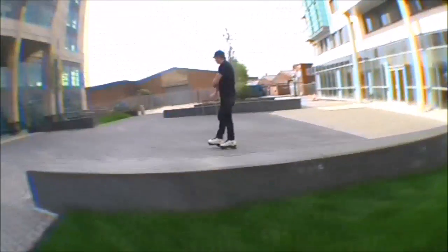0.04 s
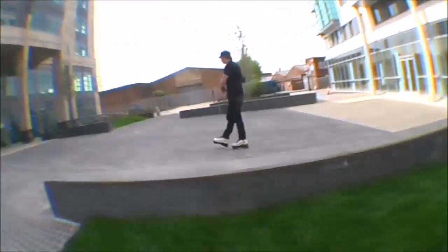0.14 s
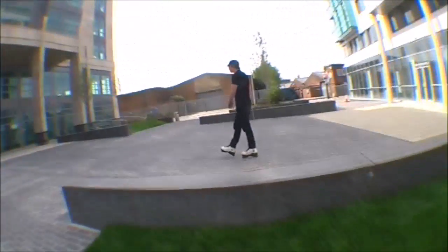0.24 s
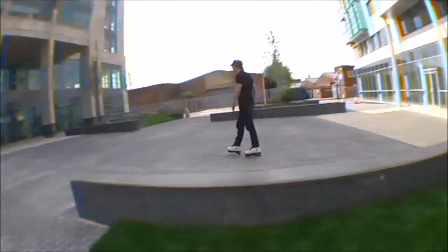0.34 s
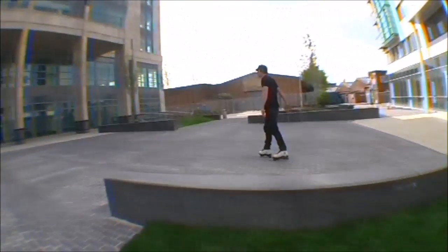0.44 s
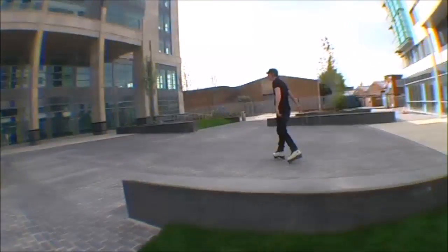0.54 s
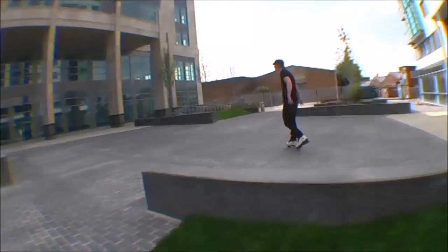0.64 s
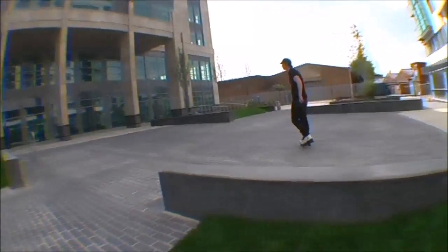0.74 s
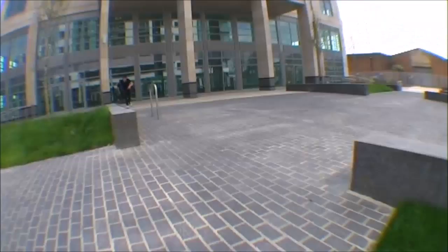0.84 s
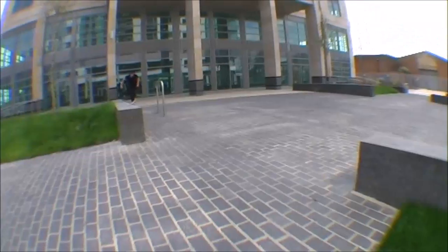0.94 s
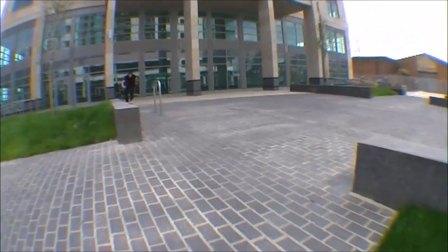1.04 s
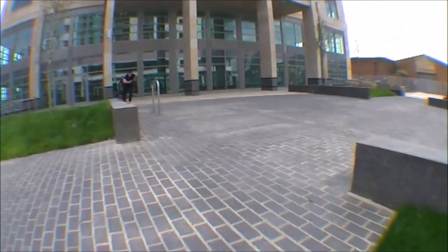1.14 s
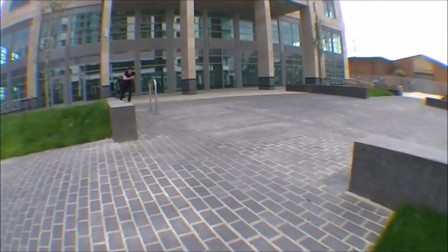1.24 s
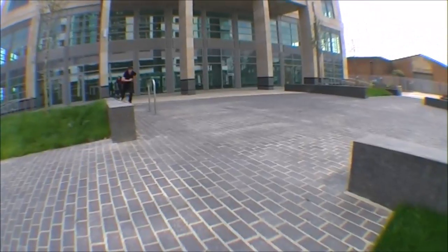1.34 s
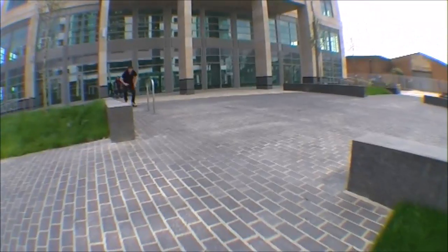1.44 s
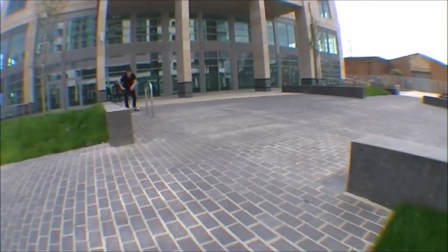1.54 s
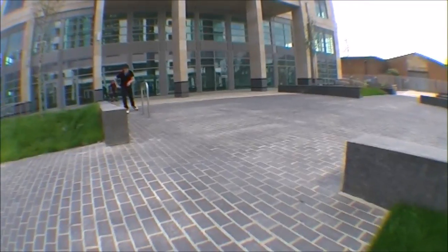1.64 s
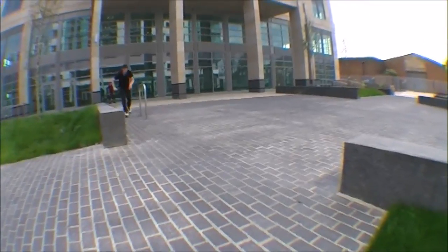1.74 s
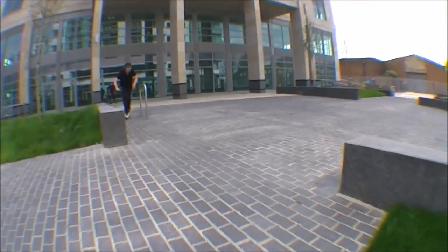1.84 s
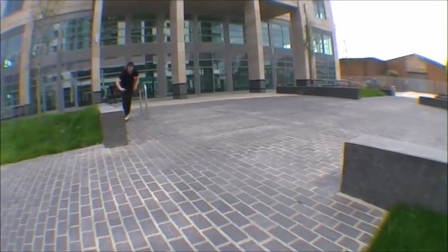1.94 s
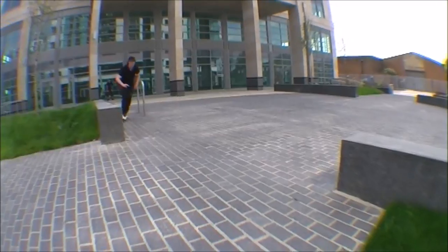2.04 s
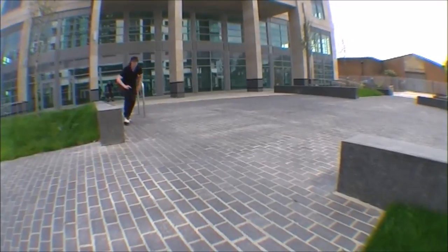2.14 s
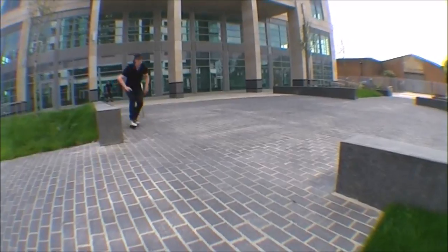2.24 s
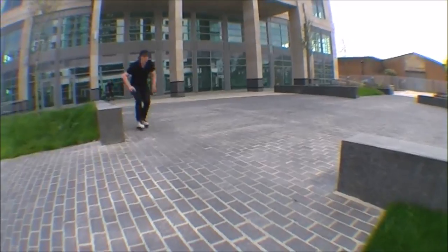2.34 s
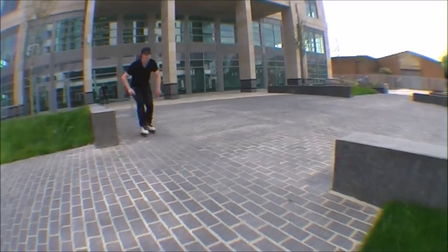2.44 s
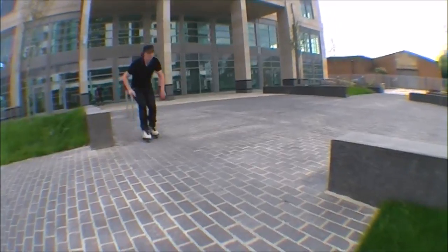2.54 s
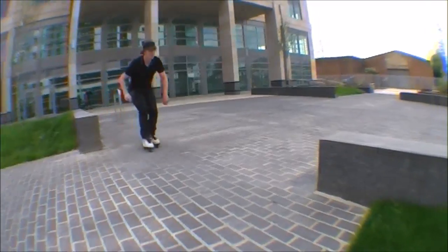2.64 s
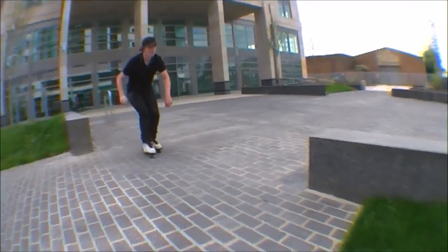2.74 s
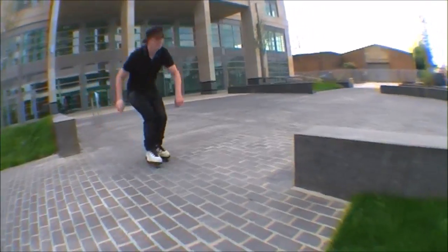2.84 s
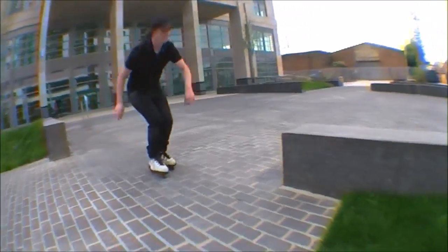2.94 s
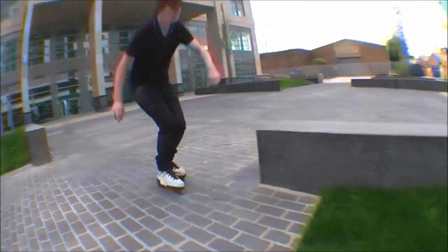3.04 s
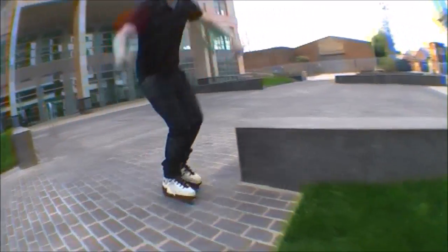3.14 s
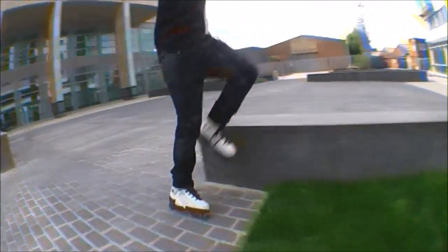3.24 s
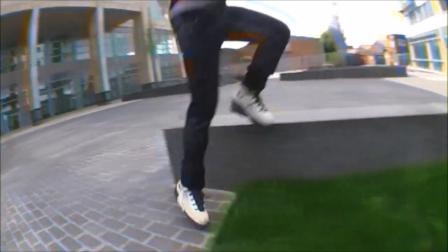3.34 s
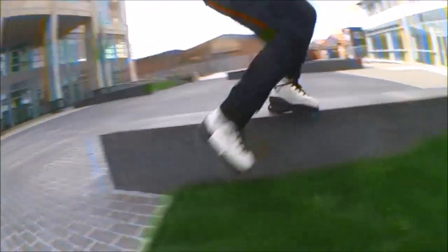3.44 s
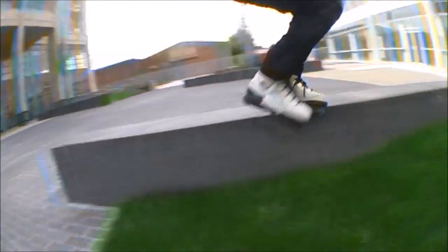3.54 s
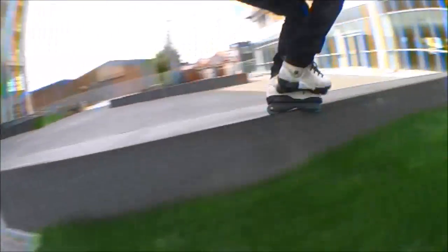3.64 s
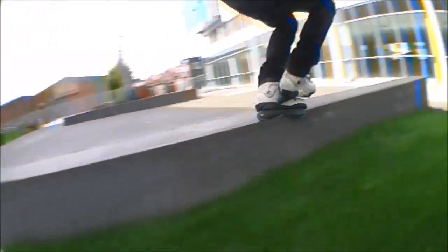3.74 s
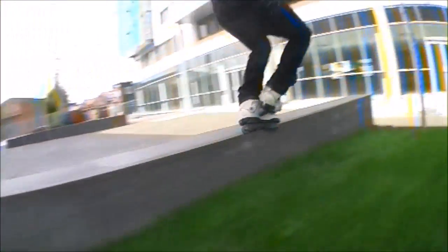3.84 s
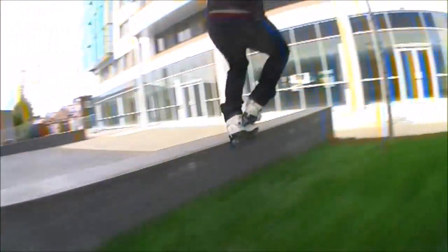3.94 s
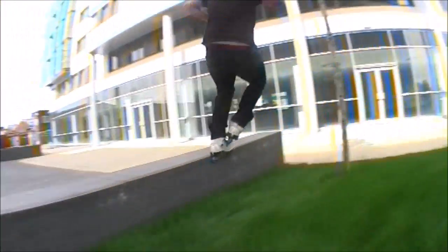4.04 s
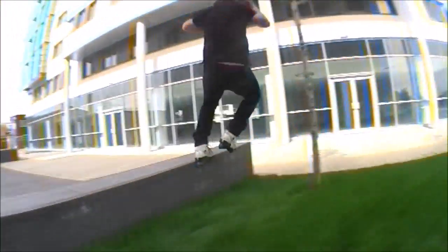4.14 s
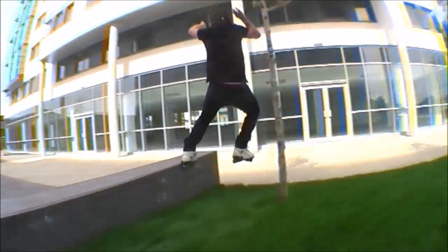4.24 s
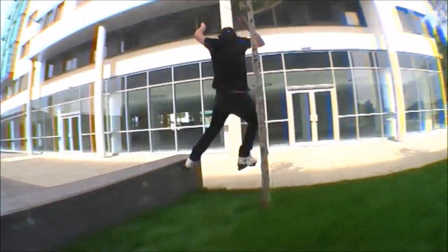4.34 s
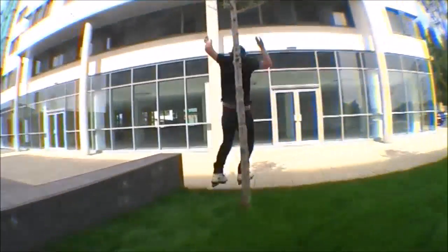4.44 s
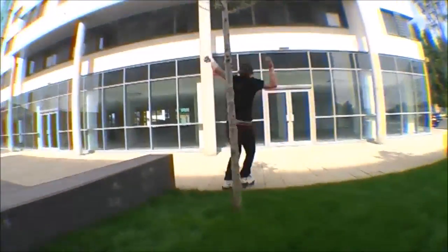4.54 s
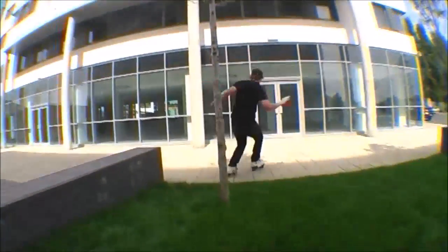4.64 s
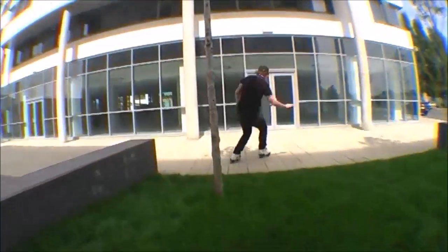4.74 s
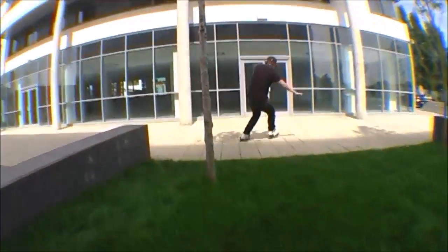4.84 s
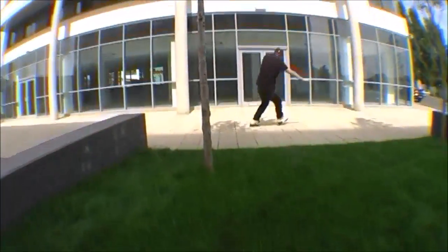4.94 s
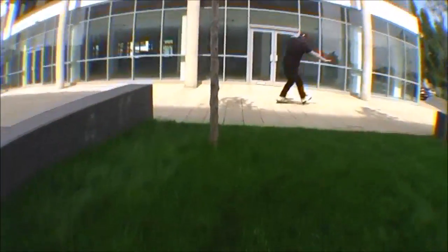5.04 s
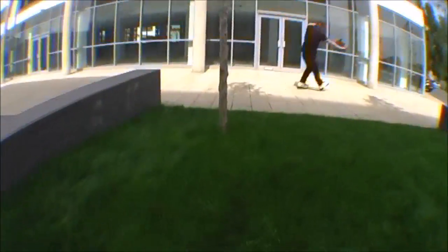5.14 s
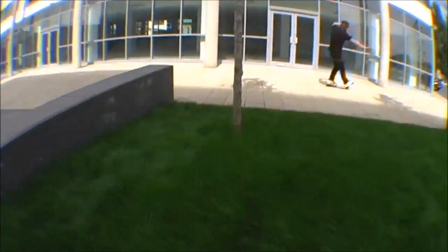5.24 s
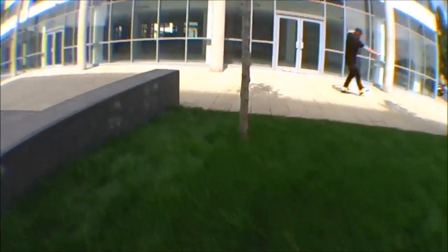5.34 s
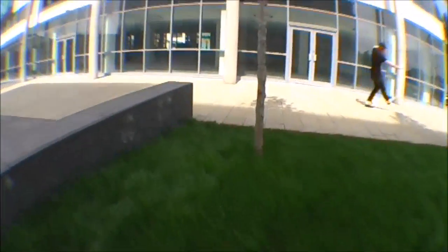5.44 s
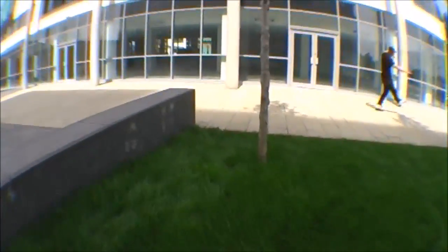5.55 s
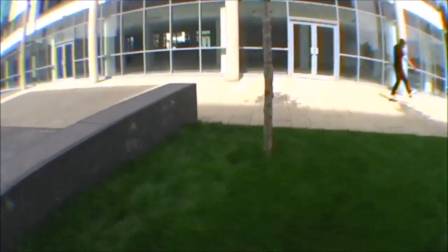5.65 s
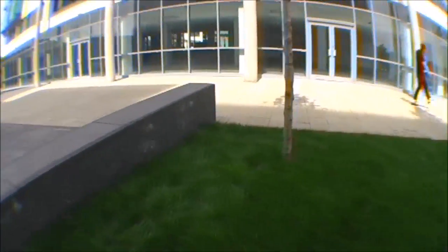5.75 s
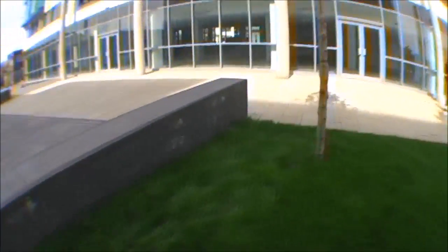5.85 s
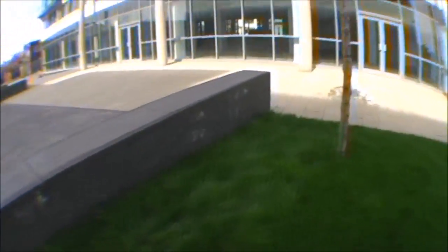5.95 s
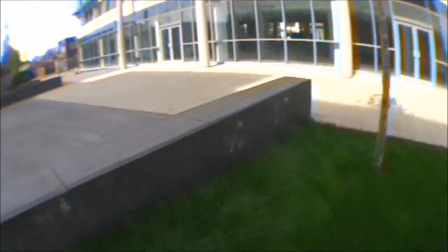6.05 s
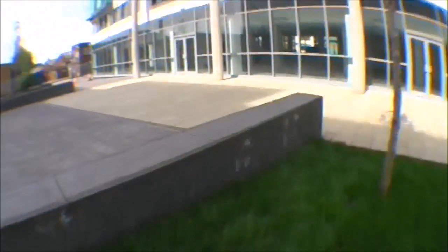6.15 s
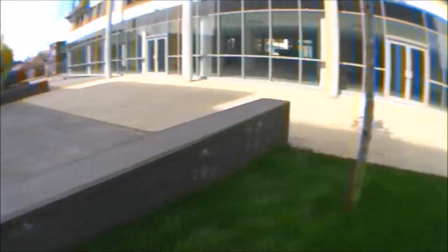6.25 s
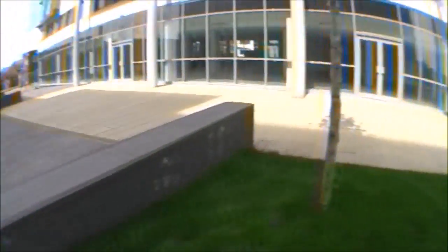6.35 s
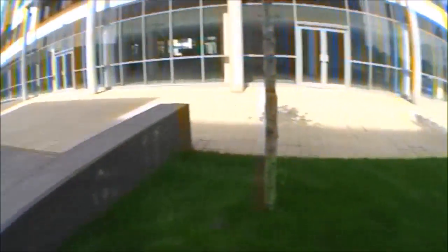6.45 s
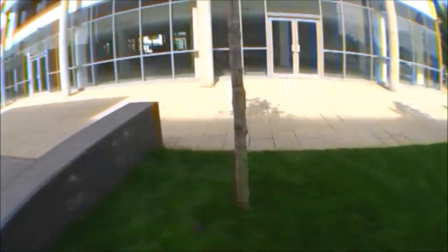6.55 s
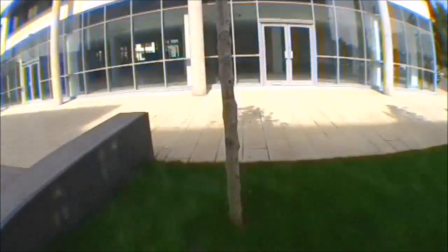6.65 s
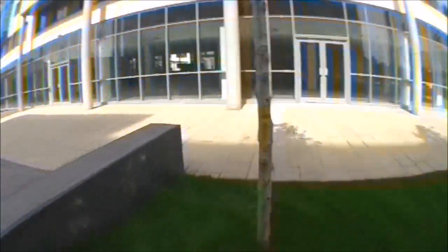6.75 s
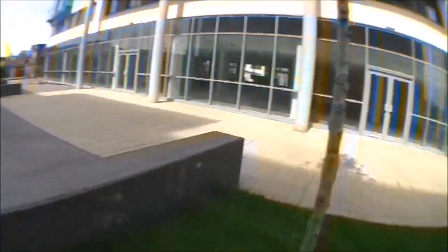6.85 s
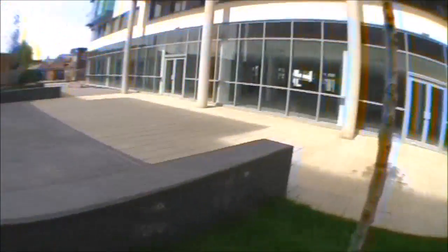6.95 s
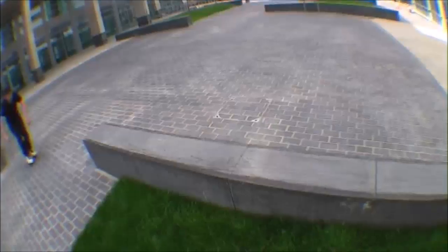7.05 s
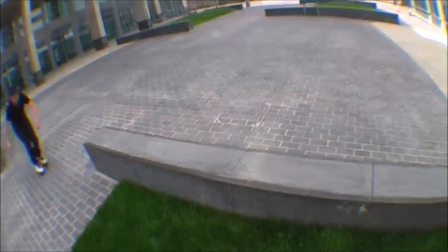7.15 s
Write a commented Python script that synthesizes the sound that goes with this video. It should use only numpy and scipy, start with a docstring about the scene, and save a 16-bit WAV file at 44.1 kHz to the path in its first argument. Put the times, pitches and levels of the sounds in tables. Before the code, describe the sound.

A thin, bass-light close outdoor microphone hears dull, faint wheel rolling and small dry ticks at first. From about 0.9 s wind rumbles and flutters strongly, gusting until past 3 s; a sharp tick comes at 1.0 s and raspy push-off scuffs at 1.15 and 1.6 s. From 1.9 s hard wheels approach, clicking over paving joints, with a knock at 2.8 s and hiss swelling to 3.25 s. At 3.39 s a huge plastic clack overloads slightly, followed by rapid knocks, a short squeal near 3.57 s and a rough, uneven grind, strongest at 3.7-3.9 s, rattling on until 4.3 s with a thin echo. Rolling drops away briefly, then a tight cluster of thuddy clacks lands at 4.52-4.58 s. Gritty bright rolling continues, fading after 5.2 s with a small clack at 5.16 s. Duller distant rolling swells around 6 s, and light wind gusts persist, rising at the end near 7.2 s.

```python
"""Inline skater grinding a ledge in wind

An inline skater rolls in over paving, hops on a concrete ledge, grinds along it, drops off and rolls away.
Wheels are rough-ground noise exciting the modes of the frame; knocks, joints and ticks are decaying bursts.
The grind is irregular slipping heard through moving resonances, with a short squeal.
Gusts are shaped noise buffeting a microphone close by, which overloads on the hardest clacks.
Duller, more distant rolling lies beneath, and a thin echo follows the skate's knocks, grind and scuffs."""
import sys
import numpy as np
from scipy import signal
from scipy.fft import rfft, irfft, next_fast_len
from scipy.io import wavfile
from scipy.ndimage import uniform_filter1d

SR = 44100
rng = np.random.default_rng(int(sys.argv[2]) if len(sys.argv) > 2 else 0)


def wav_record(signal):
    """Record a signal, one row per channel, as 16-bit PCM in the file named by sys.argv[1]."""
    frames = np.transpose(np.atleast_2d(signal))
    bounded = np.clip(frames, -1, 1)
    # unit amplitude maps onto the largest positive 16-bit level
    quanta = np.round(bounded * 32767).astype(np.int16)
    wavfile.write(sys.argv[1], SR, quanta)


N = 317740
T = np.arange(N) / SR


def amp(db):
    """Decibel law: the amplitude ratio of a level."""
    return 10 ** (np.asarray(db) / 20)


def evened(x):
    """Normalization by energy: scales x to rms 1."""
    return x / np.sqrt(np.mean(x ** 2) + 1e-20)


def peaked(x):
    """Normalization by peak: scales x to a largest excursion of 1."""
    return x / abs(x).max()


def columns(rows):
    """Linear interpolation: each column after the time becomes a curve over all samples."""
    s, *values = np.transpose(rows)
    return [np.interp(T, s, v) for v in values]


def colour(x, points):
    """Spectral shaping: weights x in frequency and sets its rms to 1."""
    f, db = np.transpose(points)
    size = next_fast_len(len(x))
    hz = np.fft.rfftfreq(size, 1 / SR)
    gain = amp(np.interp(np.log(hz + 1), np.log(f), db))
    return evened(irfft(rfft(x, size) * gain, size)[:len(x)])


def band(x, lo_hz, hi_hz):
    """Band-pass filtering between two corner frequencies."""
    return signal.sosfilt(signal.butter(2, [lo_hz, hi_hz], "bandpass", fs=SR, output="sos"), x)


def resonate(x, hz, width):
    """Heterodyne resonance of gain 1: shifts the curve hz down to zero, smooths, and shifts back."""
    turn = np.exp(2j * np.pi * np.cumsum(hz * np.ones(len(x))) / SR)
    r = np.exp(-np.pi * width / SR)
    return 2 * (turn * signal.lfilter([1 - r], [1, -r], x / turn)).real


def lumps(hz):
    """Low-passed noise: a slow random curve of rms 1, changing up to about hz times a second."""
    return evened(signal.sosfilt(signal.butter(2, hz, fs=SR, output="sos"), rng.standard_normal(N)))


def swell(s, rise_s, fall_s):
    """Bell-shaped envelope: a rise to 1 at time s and a fall after it."""
    return np.exp(-((T - s) / np.where(T < s, rise_s, fall_s)) ** 2)


def drifting(x, depth_db):
    """Random spectral modulation in patches some 260 Hz wide and a tenth of a second long."""
    z = signal.stft(x, nperseg=512, noverlap=384)[2]
    patches = uniform_filter1d(rng.standard_normal(z.shape[::-1]), size=40, axis=0)  # along time
    patches = uniform_filter1d(patches, size=3, axis=1)  # along frequency
    return signal.istft(z * amp(depth_db * evened(patches).T), nperseg=512, noverlap=384)[1][:N]


# Strength of the gusts. Each row: time in seconds, rumble level in dB before its random lumps.
GUSTS = [(0.0, -28.5), (0.272, -37), (0.288, -41.5), (0.722, -40.5), (0.88, -32), (0.89, -24), (0.98, -15),
         (1.22, -15.5), (1.33, -25), (1.68, -11), (1.8, -17.5), (2.14, -14), (3.13, -17), (3.25, -22.5),
         (3.28, -16.5), (3.32, -39), (3.35, -19), (3.38, -29), (3.46, -36.5), (3.712, -35), (3.88, -20),
         (3.924, -30), (4.018, -40), (4.31, -39), (4.34, -41.5), (4.52, -47), (4.6, -31.5), (4.91, -28),
         (4.97, -31.5), (5.37, -30.5), (5.4, -34), (5.45, -26.5), (5.49, -36), (5.81, -30), (5.87, -39.5),
         (5.92, -27), (6.18, -38), (6.21, -28.5), (6.74, -24.5), (6.83, -43), (6.88, -33), (6.95, -35),
         (7.05, -36), (7.07, -23.5), (7.186, -17.5), (7.2, -18)]
# Slow change of the wind's colour. Each row: time in seconds, flutter above the rumble in dB, boom level in dB
# before its lumps.
WIND_COLOUR = [(0, -13, -25), (.5, -3, -49.5), (.95, -12.5, -26), (2.0, -9.5, -26), (2.7, -6.5, -30),
               (3.08, -1.5, -21), (3.4, -11.5, -48), (3.6, -12, -40), (3.75, -5, -31), (3.89, -11, -20),
               (3.97, -5, -31), (4.2, 2, -57), (4.9, -2.5, -53), (5.5, -9, -48), (5.8, -12.5, -35),
               (7.0, -9.5, -34), (7.2, -6, -31)]
# Spectra of the three wind bands. Each row: frequency in Hz, relative density in dB per Hz.
RUMBLE_SPECTRUM = [(30, -72), (60, -67), (90, 0), (110, -3.5), (145, -1), (195, 1), (244, -2), (300, -12),
                   (420, -46), (1500, -120)]
FLUTTER_SPECTRUM = [(100, -60), (280, 1), (360, 5.5), (500, 0), (600, -10), (1000, -11.5), (4000, -110)]
BOOM_SPECTRUM = [(15, -70), (35, -27), (60, -10.5), (85, -10), (110, -6), (400, -110)]
# How much the two ports differ as the microphone turns, against the sound they share; also used by rolling.
# Each row: time in seconds, wind difference in dB, treble difference in dB against the grit.
PORT_DIFFERENCE = [(0, -43, -35), (.85, -16, -10), (.92, -68, -70), (3.3, -68, -47), (3.85, -17, -41),
                   (4.5, -56, -24), (5.1, -64, -14), (5.6, -11.5, -3.5), (6.6, -7.5, 8.5), (6.75, -11, -9),
                   (7.05, -18, -2), (7.1, -6.5, 7)]


def wind():
    """Turbulence noise: eddies burst on the ports, part differing left to right. Returns mid and side."""
    rumble_db, = columns(GUSTS)
    flutter_db, boom_db = columns(WIND_COLOUR)
    difference_db, _ = columns(PORT_DIFFERENCE)
    lumpy = amp(2.01 * lumps(43.4))
    boom_gain = amp(boom_db + 1.5 * lumps(5.8))

    def eddies():
        """Independent turbulence under a shared envelope."""
        rumble = colour(rng.standard_normal(N), RUMBLE_SPECTRUM)
        flutter = amp(flutter_db) * colour(rng.standard_normal(N), FLUTTER_SPECTRUM)
        boom = boom_gain * colour(rng.standard_normal(N), BOOM_SPECTRUM)
        return lumpy * (amp(rumble_db) * (rumble + flutter) + boom)

    mid = eddies()
    return mid, eddies() * amp(difference_db)


def gravel(per_s, spread_db, share, lump_db):
    """Roughness excitation: a steady rub plus sparse stones of uneven size, both lumpy."""
    stones = amp(spread_db * np.minimum(rng.exponential(1, N), 4)) * (rng.random(N) < per_s / SR)
    rub = rng.standard_normal(N) + share * evened(stones * rng.choice([-1., 1.], N))
    return rub * amp(lump_db * lumps(32.0))


SNAPS_PER_S, SNAP_RMS_DB, SNAP_SPREAD_DB = 130., -7., 4.


def snaps():
    """Shot noise: single grains crushed under a wheel give bright brief bursts of uneven size."""
    t = np.arange(200) / SR
    sizes = amp(SNAP_SPREAD_DB * np.minimum(rng.exponential(1, N), 3))
    grains = sizes * (rng.random(N) < SNAPS_PER_S / SR)
    envelope = signal.oaconvolve(grains, amp(-60 * t / 0.0044))[:N]
    return amp(SNAP_RMS_DB) * evened(envelope * rng.standard_normal(N))


NEAR_DB = -30  # tread hiss level at which the next two levels hold
HUM_DB, HUM_FOLLOWS = -30, 0.83  # frame hum, and its change in dB per dB of hiss
FIZZ_DB, FIZZ_FOLLOWS = -38., 1.25  # grit, likewise
AIR_DB = -57  # faint treble floor
# swell as the skates pass the microphone
PASS_S, PASS_RISE_S, PASS_FALL_S, PASS_HUM_DB, PASS_FIZZ_DB = 3.26, 0.089, 0.068, 9, 6
# Wheels on the ground, louder as they come near, faint in the air.
# Each row: time in seconds, tread hiss level in dB.
ROLL = [(0, -47), (.36, -48), (.88, -54.5), (.89, -47.5), (1.2, -47), (1.7, -51.5), (1.92, -41),
        (2.12, -37.5), (2.56, -36.5), (2.75, -31.5), (3.1, -29.5), (3.36, -28.5), (3.54, -32),
        (3.74, -26.5), (3.92, -27.5), (4.15, -30.5), (4.2, -27.5), (4.318, -31), (4.335, -36),
        (4.37, -45.5), (4.51, -52.5), (4.55, -32.5), (4.72, -28.5), (4.99, -28), (5.21, -32.5), (5.44, -39),
        (5.71, -38), (6.23, -40), (6.3, -37.5), (6.38, -36), (6.45, -37), (6.55, -40), (7.05, -48.5),
        (7.07, -37), (7.2, -33.5)]
# Duller rolling further off, heard through the same modes.
# Each row: time in seconds, level in dB, tilt of the modes in dB per octave.
FAR_ROLL = [(0, -36.5, -7), (.45, -37, -3.5), (.88, -41.5, -3), (1.1, -41.5, -1.5), (1.8, -44, -1),
            (3.0, -39, 1.5), (4.5, -43, -0.5), (5.2, -47, 6), (5.75, -36.5, 4), (6.05, -32, 3),
            (6.35, -34.5, 6.5), (6.85, -35, -0.5), (7.05, -37.5, -0.5), (7.2, -29, -9)]
# Modes of skate frame and boot.
# Each row: frequency in Hz, relative width in Hz (widened by 1.81 below), gain in dB.
FRAME_MODES = [(540, 315, -5.5), (810, 115, 8), (1043, 96, 5), (1320, 120, 9.5), (1544, 613, -3.5)]
# Spectra of tread hiss, crushed grit and port difference.
# Each row: frequency in Hz, relative density in dB per Hz.
TREAD_SPECTRUM = [(500, -60), (1200, 3.5), (1800, -3.5), (2300, 2), (3400, 0), (4500, -1.5), (5600, -9),
                  (7500, -33), (14000, -54)]
GRIT_SPECTRUM = [(3500, -63), (5800, -8), (7000, -3.5), (9000, 0), (10500, -5.5), (11800, -8.5),
                 (13000, -10), (15600, -19), (16100, -50)]
PORT_SPECTRUM = [(500, -28), (2500, -20), (4000, -13), (8000, -4.5), (11000, 9.5), (15600, -14),
                 (16100, -50)]


def rolling():
    """Modal excitation: the ground shakes the frame; tread and grit add hiss. Returns mid and side."""
    hiss_db, = columns(ROLL)
    far_db, tilt_db = columns(FAR_ROLL)
    _, difference_db = columns(PORT_DIFFERENCE)
    close = swell(PASS_S, PASS_RISE_S, PASS_FALL_S)
    near_gain = amp(HUM_DB + HUM_FOLLOWS * (hiss_db - NEAR_DB) + PASS_HUM_DB * close)
    hum_gain = np.hypot(near_gain, amp(far_db))
    fizz_gain = amp(FIZZ_DB + FIZZ_FOLLOWS * (hiss_db - NEAR_DB) + PASS_FIZZ_DB * close)
    fizz_gain = np.hypot(fizz_gain, amp(AIR_DB))

    ground = gravel(per_s=500., spread_db=3., share=0.25, lump_db=1.6)
    hum = np.zeros(N)
    for k, (hz, width, db) in enumerate(FRAME_MODES):
        mode = resonate(resonate(ground, hz, 1.81 * width), hz, 1.81 * width)
        tilt = tilt_db * np.log2(hz / FRAME_MODES[2][0])
        hum += (-1) ** k * amp(db + tilt) * mode  # neighbouring modes in opposite phase

    fine = evened(ground + 0.82 * gravel(per_s=110.0, spread_db=0.5, share=0.49, lump_db=0.0))
    crushed = snaps()
    hiss = amp(hiss_db) * colour(fine + 0.4 * crushed, TREAD_SPECTRUM)
    fizz = fizz_gain * colour(fine + crushed, GRIT_SPECTRUM)
    # for rolling, the ports differ only at short wavelengths
    aside = fizz_gain * amp(difference_db) * colour(rng.standard_normal(N), PORT_SPECTRUM)
    return drifting(hum_gain * evened(hum) + hiss + fizz, depth_db=1.36), aside


FAINT_PER_S, FAINT_DB, FAINT_SPREAD_DB = 8., -38, 4.  # many more ticks, barely heard; relative level
TAIL_DB, TAIL_FOLLOWS = -17, 0.68  # tail of a 0 dB tick, and its extra change in dB per dB of the tick
# Dry treble ticks. Each row: start in seconds, relative level in dB.
TICKS = [(0.2014, -25), (0.3244, -18.5), (0.4888, -21.5), (0.55, -21.5), (0.8112, -11), (0.844, -31),
         (0.8964, -29), (0.9989, -1.5), (1.0532, -29), (1.0886, -42), (1.1882, -23), (1.412, -33),
         (1.4688, -28), (1.497, -34), (1.586, -18.5), (1.611, -19), (1.783, -22), (1.971, -14.5),
         (2.204, -32), (2.346, -24), (2.395, -20), (2.4401, -26), (2.6092, -32), (2.6958, -25), (2.92, -21),
         (2.9314, -14), (3.0905, -15), (3.19, -8), (3.2088, -7), (3.6602, -20), (3.826, -6), (3.853, -3),
         (3.87, -10), (3.893, -17), (4.1571, -18), (4.1895, -16), (4.307, -6), (4.332, -31), (4.342, -17),
         (5.1038, -12), (6.4118, -28)]
# Spectrum of the ticks. Each row: frequency in Hz, relative density in dB per Hz.
TICK_SPECTRUM = [(710, -44), (1200, -14), (4000, -5), (5070, -7.5), (7020, -4), (7660, -8), (9410, -1.5),
                 (16000, -16)]


def ticks():
    """Impulsive noise: a snap falling 60 dB in 10 ms, with a faint hissing tail."""
    out, t = np.zeros(N + 3000), np.arange(3000) / SR
    snap, tail = amp(-60 * t / 0.01), amp(-60 * (t / 0.066) ** 2)
    for s, db in TICKS:
        envelope = amp(db) * (snap + amp(TAIL_DB + TAIL_FOLLOWS * db) * tail)
        out[round(s * SR):][:len(t)] += envelope * rng.standard_normal(len(t))
    sizes = amp(FAINT_DB + FAINT_SPREAD_DB * np.minimum(rng.exponential(1, N), 3))
    faint = sizes * (rng.random(N) < FAINT_PER_S / SR)
    out = out[:N] + signal.oaconvolve(faint, snap)[:N] * rng.standard_normal(N)
    level = np.sqrt(np.mean(out ** 2))
    return amp(-13.0) * level * colour(out, TICK_SPECTRUM)


# A skate scuffs as it pushes off.
# Each row: start in seconds, initial level in dB, 60 dB decay time in seconds.
SCUFFS = [(1.148, -31.5, 0.89), (1.5764, -29, 0.37), (1.6294, -30.5, 0.34)]


def scuffs():
    """Friction noise with exponential decay: a sudden rasp that fades as the wheel bites."""
    out, t = np.zeros(N), np.arange(SR // 2) / SR
    for s, db, t60 in SCUFFS:
        rasp = evened(band(rng.standard_normal(len(t)), 430.0, 1870.0))
        bright = evened(band(rng.standard_normal(len(t)), 4700.0, 9300.0))
        rasp += 0.15 * bright * amp(-60 * t / 0.22)
        out[round(s * SR):][:len(t)] += amp(db - 60 * t / t60) * rasp
    return out


# Wheels clicking over joints and chips. Each row: start in seconds, level of the ring in dB, ring in Hz.
JOINTS = [(1.8163, -31, 1950), (1.8787, -39, 1490), (1.903, -20.5, 2000), (2.048, -20.5, 2480),
          (2.0967, -22, 1900), (2.163, -20.5, 2370), (2.2119, -37, 2170), (2.226, -23.5, 2520),
          (2.2702, -22, 2440), (2.38, -28, 1500), (2.45, -19, 2470), (2.504, -23, 1500), (2.775, -19, 2490),
          (3.1572, -26, 1520), (3.211, -24, 1800), (3.479, -17, 1890), (3.851, -12, 1770),
          (3.9968, -16, 3400), (4.088, -18, 3220), (4.0978, -12, 1660), (4.156, -25, 1950),
          (4.2203, -19, 1660), (4.282, -13, 3370), (5.426, -26, 1740), (5.878, -25, 2260),
          (6.7545, -29, 1750)]


def joints():
    """Impact on damped modes: a hard wheel drops on an edge and rings, with the axle's higher mode."""
    out, t = np.zeros(N), np.arange(1500) / SR
    envelope = amp(-60 * t / 0.017) * np.minimum(t / 0.00016, 1)
    for s, db, hz in JOINTS:
        ring = np.sin(2 * np.pi * hz * t)
        axle = 0.33 * np.sin(2 * np.pi * 3800.0 * t + 2 * np.pi * rng.random())
        clatter = 2.5 * band(rng.standard_normal(len(t)), 640.0, 2520.0)
        out[round(s * SR):][:len(t)] += amp(db) * envelope * (ring + axle + clatter)
    return out


HOLD = 0.16  # the rattle holds for this share of its t60
RING_WIDTH = 0.26  # width of the first ring filter as a share of its pitch; the second is twice as wide
AXLE_HZ, AXLE_WIDTH_HZ, AXLE_SHARE = 3190, 780, 0.27  # the axle rings within each slap
# full weight comes down at the landing; thud levels are against the ring
LANDING_S, THUD_DB, LANDING_THUD_DB, SETTLE_DB_PER_S = 4.515, -14.5, 9, -300.
# Skate knocks. Each row: start in seconds, ring peak in dB, ring in Hz, slap above the ring in dB,
# crack above the ring in dB, 60 dB decay time of the rattle in seconds after its hold.
CLACKS = [(2.796, -11, 1270, 2, 1, 0.014), (3.3899, 3.5, 1420, -0.5, -1, 0.034),
          (3.4216, -9, 880, 11, -8, 0.0089), (3.4242, -1, 810, 2, 3, 0.029),
          (3.452, -7.5, 940, -2, -11, 0.02), (3.524, -12, 810, 5.5, -1, 0.03),
          (3.605, -8.5, 800, 12.5, 17, 0.011), (3.612, -10, 795, 3.5, -15, .022),
          (3.748, -12, 870, -2, 0, .026), (3.837, -9, 1090, 5, 6.5, 0.025), (3.924, -9, 1320, 3, 2, 0.02),
          (3.944, -14.5, 1260, 10, -3, 0.029), (4.053, -5.5, 1470, -3.5, -19, 0.057),
          (4.066, -10.5, 1530, 11.5, 11.5, 0.014), (4.267, -12, 1320, 6.5, 0, 0.014),
          (4.293, -12.5, 810, 5, -11, 0.027), (4.5222, -15.5, 900, 10, 4, .025),
          (4.5293, -15, 730, 7, 7, 0.03), (4.5403, -10.5, 780, 9.5, 12, 0.022),
          (4.558, -11, 1320, 5, -8, 0.012), (4.563, -14, 1170, 5, -10, 0.012),
          (4.57, -15.5, 845, 9, 6, 0.023), (4.5815, -12, 890, -0.5, -6, 0.045),
          (5.1607, -21, 1800, 8, -2, 0.016)]


def clacks():
    """Impact on a resonator: a rattling burst rings the plastic, with slap and crack on top, thud below."""
    out, t = np.zeros(N + 6000), np.arange(6000) / SR
    for s, db, hz, slap_db, crack_db, t60 in CLACKS:
        fade = amp(-60 * np.maximum(t - HOLD * t60, 0) / t60) * np.minimum(t / 0.00022, 1)
        contact = 9.1 * (np.arange(len(t)) == 10)
        burst = (rng.standard_normal(len(t)) + contact) * fade  # first contact within the rattle
        ring = resonate(burst, hz, RING_WIDTH * hz)
        ring = resonate(ring, hz, 2 * RING_WIDTH * hz) * np.sqrt(fade)
        axle = peaked(resonate(burst * fade, AXLE_HZ, AXLE_WIDTH_HZ))
        slap = peaked(band(burst * fade, 1700., 5000.)) + AXLE_SHARE * axle
        crack = band(burst * fade ** 2, 4500., 12000.)
        # boot and slab
        thud = -np.sin(2 * np.pi * 193.0 * t) * amp(-60 * t / 0.073)
        thud -= 0.54 * np.sin(2 * np.pi * 433.0 * t) * amp(-60 * t / 0.037)
        thud += 1.35 * peaked(band(rng.standard_normal(len(t)) * amp(-60 * t / 0.049), 194.0, 680.0))
        thud_db = THUD_DB if s < LANDING_S else LANDING_THUD_DB + SETTLE_DB_PER_S * (s - LANDING_S)
        sound = peaked(ring) + amp(slap_db) * peaked(slap) + amp(crack_db) * peaked(crack)
        sound += amp(thud_db) * thud
        out[round(s * SR):][:len(t)] += amp(db) * sound
    return band(out[:N], 80.0, 10700.0)


SQUEAL_S, SQUEAL_RISE_S, SQUEAL_FALL_S = 3.568, .022, .014
SQUEAL_DB, SQUEAL_HZ, SQUEAL_ROUGH = -14., 812., .3  # rough: rms of the noisy part against the tone
# Sole plate sliding on the edge. Each row: time in seconds, chatter level in dB,
# high strand above the low one in dB, low strand in Hz, high strand in Hz (both waver about these).
GRIND = [(3.34, -53, 10, 900, 1400), (3.375, -32.5, 10, 880, 1480), (3.41, -29, -6, 855, 1440),
         (3.49, -27, -8, 814, 1410), (3.51, -45, -11, 805, 1400), (3.535, -28.5, 2.5, 810, 1350),
         (3.625, -27, -6, 840, 1270), (3.67, -19, -20, 976, 1250), (3.75, -20, -14, 920, 1300),
         (3.81, -18, -2, 870, 1330), (3.85, -24.5, 0, 1040, 1380), (3.92, -29, 6.5, 990, 1350),
         (4.0, -35, 10.5, 860, 1340), (4.055, -41, 14, 815, 1540), (4.11, -30, 8.5, 800, 1450),
         (4.155, -38, 6, 795, 1420), (4.22, -31.5, 7.5, 810, 1340), (4.27, -33.5, 11.5, 810, 1400),
         (4.315, -34.5, 12, 834, 1580), (4.328, -45, 14, 800, 1480)]


def grind():
    """Stick-slip friction: random slips through two moving plate resonances, and a short wavering squeal."""
    low_db, tilt_db, low_hz, high_hz = columns(GRIND)
    touching = (T > GRIND[0][0]) & (T < GRIND[-1][0])
    on = uniform_filter1d(touching * 1., size=400)  # softens the two ends
    slips = gravel(per_s=250., spread_db=4.5, share=1.1, lump_db=1.0)
    waver = 1 + 0.056 * lumps(25.0)  # the contact patch shifts
    low = evened(resonate(resonate(slips, low_hz * waver, 150.0), low_hz * waver, 170.0))
    high = evened(resonate(resonate(slips, high_hz * waver, 210.0), high_hz * waver, 210.0))
    chatter = on * amp(low_db) * (low + amp(tilt_db) * high)

    wobble = 1 + 0.012 * lumps(39.4)
    tone = np.sqrt(2) * np.sin(2 * np.pi * np.cumsum(SQUEAL_HZ * wobble) / SR)
    squeal = tone + SQUEAL_ROUGH * evened(resonate(slips, SQUEAL_HZ, 80.0))
    squeal *= swell(SQUEAL_S, SQUEAL_RISE_S, SQUEAL_FALL_S) * amp(SQUEAL_DB + 0.96 * lumps(90.))
    return chatter + squeal


def plaza(x):
    """Sparse reverberation: glass fronts throw back a thin tail of random-signed taps, dying away."""
    t = np.arange(SR // 2) / SR
    taps = rng.choice([-1., 1.], len(t)) * (rng.random(len(t)) < .05)
    taps = taps * amp(-60 * t / 0.11) * (t > .008)
    return signal.fftconvolve(x, taps / np.linalg.norm(taps))[:N]


def scene():
    """Superposition: sums all sources and turns mid and side into left and right."""
    gusts, gusts_aside = wind()
    wheels, wheels_aside = rolling()
    skate = clacks() + grind() + joints() + scuffs()
    mid = gusts + wheels + skate + amp(-20.5) * plaza(skate) + ticks()
    side = gusts_aside + wheels_aside
    return np.array([mid + side, mid - side])


def record(dry):
    """Soft saturation: the preamplifier flattens the hardest peaks; then the band limit."""
    # small capsule: weak bass
    dry = signal.sosfilt(signal.butter(2, 45., "highpass", fs=SR, output="sos"), dry)
    ceiling = .88
    loud = dry / (1 + abs(dry / ceiling) ** 8.) ** .125
    lowpass = signal.firwin(255, 16300, window=("kaiser", 9), fs=SR)  # edge in Hz
    return signal.oaconvolve(loud, lowpass[None], "same")


dry = scene()
out = record(dry)
wav_record(out)
```